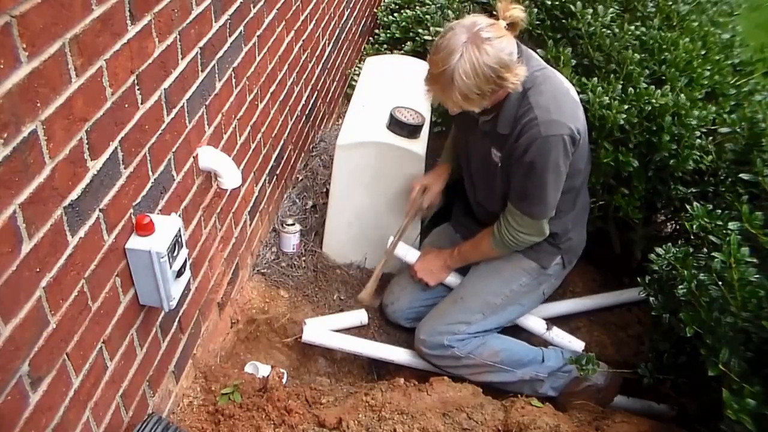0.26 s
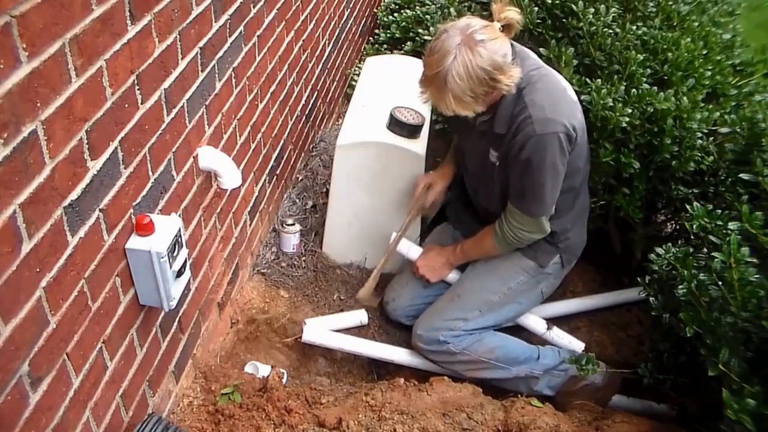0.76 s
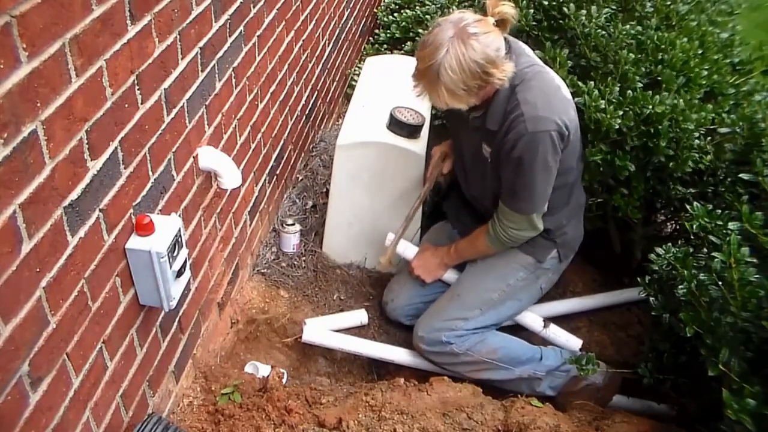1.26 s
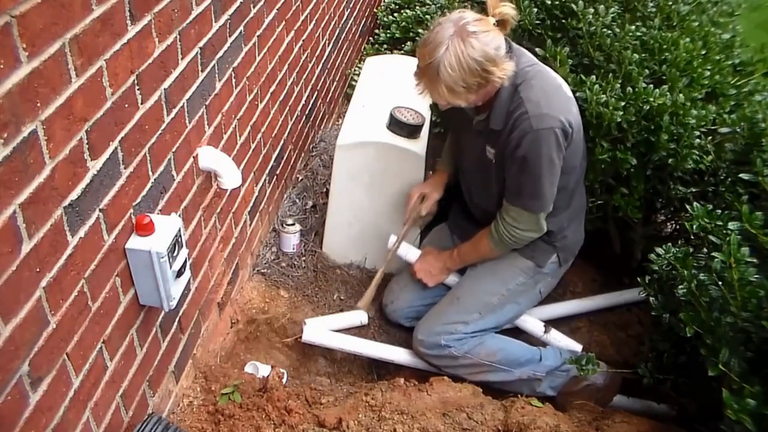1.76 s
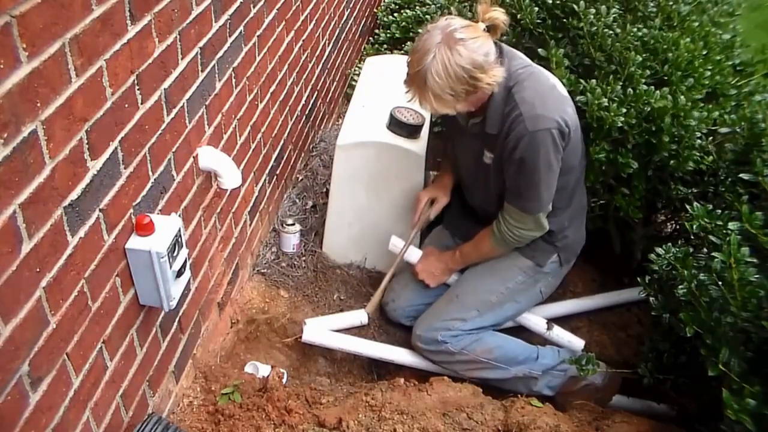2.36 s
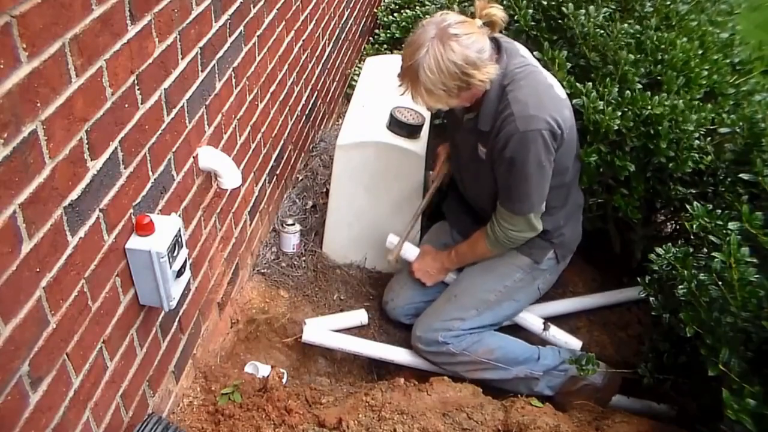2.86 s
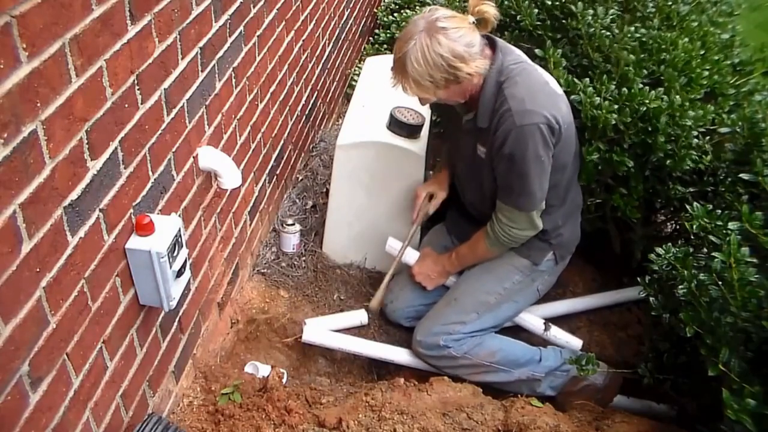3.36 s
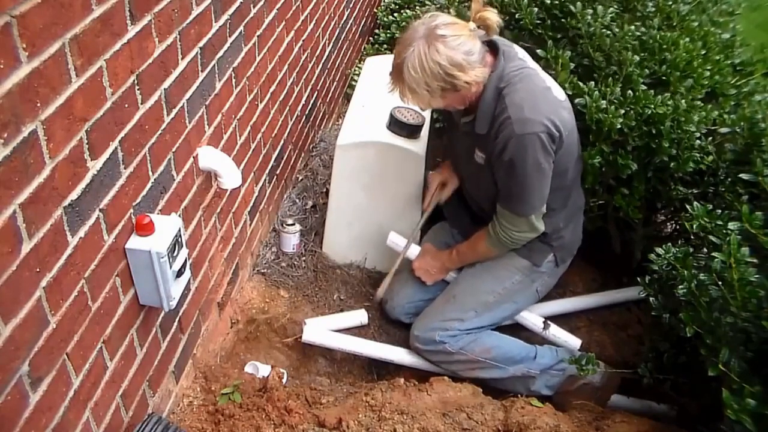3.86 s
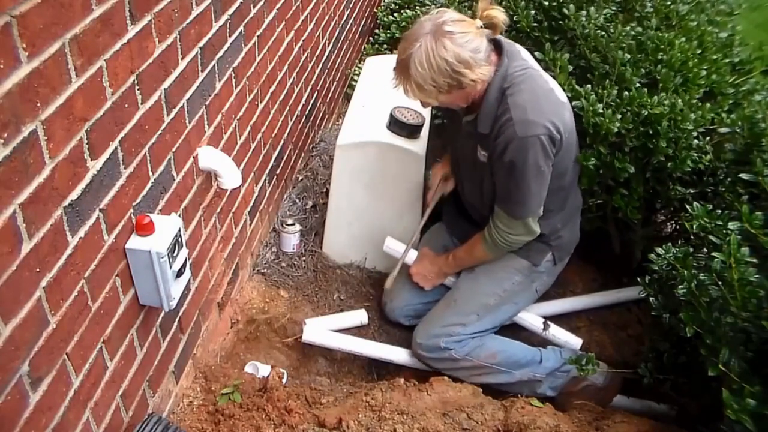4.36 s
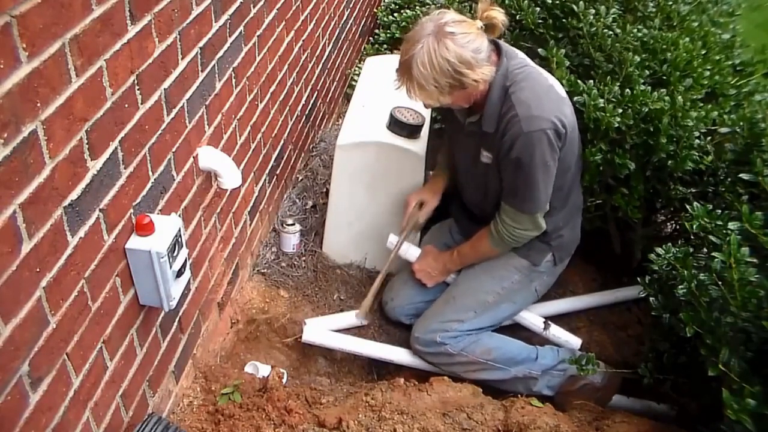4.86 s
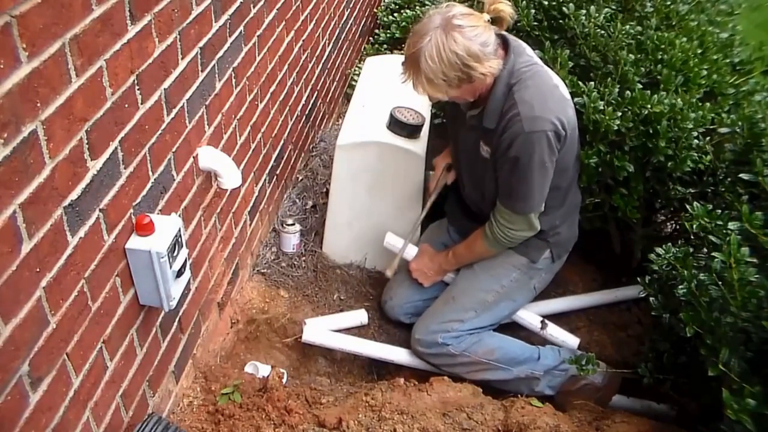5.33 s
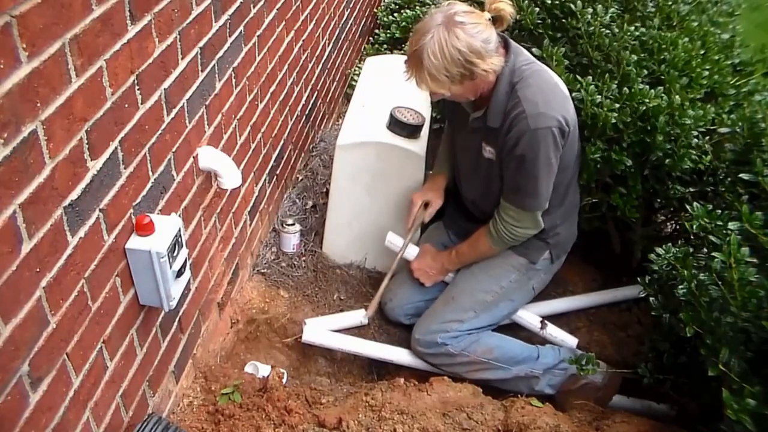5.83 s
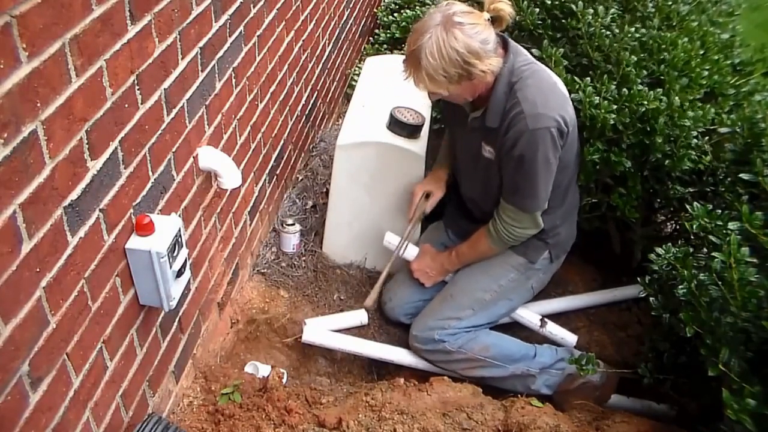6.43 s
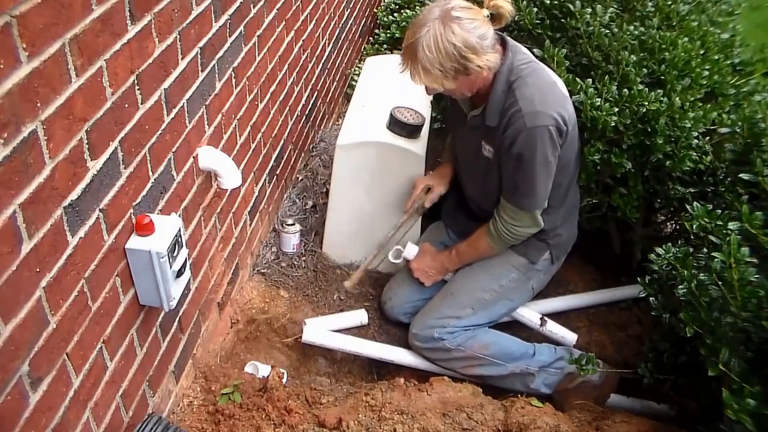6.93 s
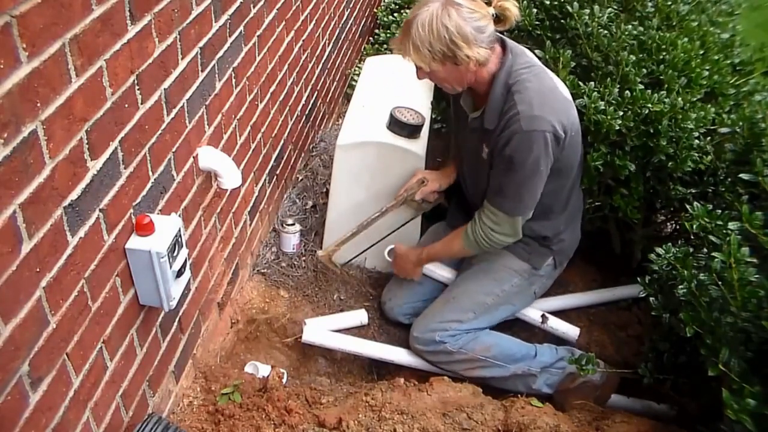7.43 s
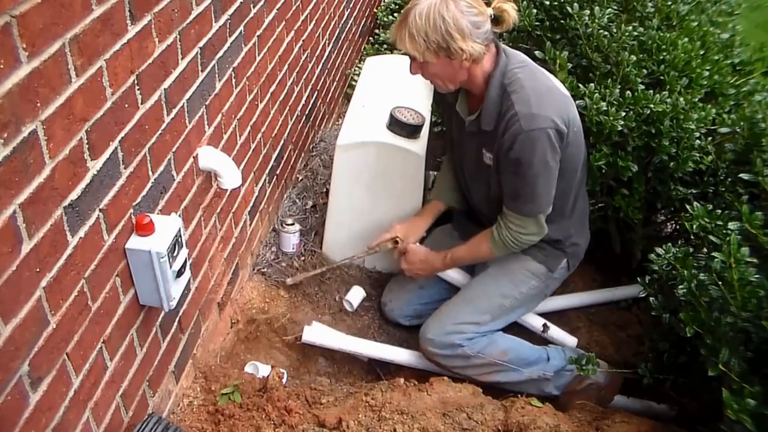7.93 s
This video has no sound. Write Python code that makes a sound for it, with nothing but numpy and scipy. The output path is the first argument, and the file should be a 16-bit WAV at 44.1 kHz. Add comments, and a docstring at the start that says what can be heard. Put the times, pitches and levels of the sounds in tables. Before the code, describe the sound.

A hand saw bites through a thin plastic pipe near a stereo microphone beside a brick wall, which gives a very short reflection. Steady, rapid push strokes buzz and scrape, lighter pulls fill the gaps, and the blade clacks lightly. The cut weakens, ends in a dull thump, and the loose piece cracks against another pipe. Soft garden air, low rumble, hum and thin insects remain underneath.

```python
"""A hand saw rasps through a plastic pipe close to the microphones: a light pull, a hard push, three times a second.
Its teeth tear off chips as noise and, where they bite evenly, sing as tones at their passing rate.
Steel clacks as the blade turns round; a brick wall outdoors answers; rumble, air, hum and insects lie behind.
The deepening cut grows thin and ragged, a faint whistle slides up and down, and the pipe parts with a thump.
The loose end then knocks against other pipes as cracks of noise and damped hollow tones."""
import sys
import numpy as np
from scipy import signal
from scipy.fft import rfft, irfft, next_fast_len
from scipy.io import wavfile
from scipy.ndimage import uniform_filter1d, map_coordinates

SR = 44100
rng = np.random.default_rng(int(sys.argv[2]) if len(sys.argv) > 2 else 0)


def persist_wave(psi):
    """Save psi, clipped to +-1, as 16-bit WAV."""
    counts = np.round(np.clip(psi, -1, 1) * 32767).astype(np.int16)
    wavfile.write(sys.argv[1], SR, np.atleast_2d(counts).T)


N = 361179
T = np.arange(N) / SR  # s

# the steel blade rings on: (frequency [Hz], relative level [dB], time to fall 60 dB [s])
BLADE_MODES = [(1383, -4, 0.028), (3090, -9.5, 0.14), (3416, 5, 0.036), (5150, -30, .1), (5780, -24, 0.062),
               (6170, -7, .1), (7100, -5, 0.13), (10500, -14, .05), (9986, -17, .05)]
# likeness of left and right at the microphones: (frequency [Hz], likeness [0-1])
LIKENESS = [(100, 0.63), (600, 0.58), (1200, 0.98), (2800, 1), (4000, 0.92), (5600, 0.71), (7500, 0.22),
            (10000, 0.53), (13000, 0.12)]


def amp(db):
    """Decibels to gain."""
    return 10 ** (np.asarray(db) / 20)


def unit(x):
    """Scale to rms 1."""
    return x / np.sqrt(np.mean(x ** 2) + 1e-20)


def along(points, hz):
    """Interpolate (frequency [Hz], value) points on a log frequency axis."""
    point_hz, values = np.transpose(points)
    return np.interp(np.log(hz + 1), np.log(point_hz + 1), values)


def wobble(rate):
    """A smooth random curve through rate knots a second."""
    knots = rng.standard_normal(int(N * rate / SR) + 4)
    return map_coordinates(knots, [T * rate])


def swell(t, s, width):
    """A bell-shaped rise and fall about s."""
    return np.exp(-.5 * ((t - s) / width) ** 2)


def envelope(start, attack, hold, release):
    """A straight rise from 0 to 1, a hold and a fall; all times in s."""
    corners = start + np.cumsum([0, attack, hold, release])
    return np.interp(T, corners, [0, 1, 1, 0])


def filtered(x, response):
    """Apply a response of frequency to x."""
    m = next_fast_len(x.shape[-1] + 8192)
    spectrum = rfft(x, m) * response(np.fft.rfftfreq(m, 1 / SR))
    return irfft(spectrum, m)[..., :x.shape[-1]]


def spread(pair, colour, alike=LIKENESS):
    """Two unrelated signals become a coloured left and right of rms 1."""
    def mid_side(hz):
        turn = np.arccos(np.clip(along(alike, hz), -1, 1)) / 2
        return colour(hz) * np.array([np.cos(turn), np.sin(turn)])

    mid, side = filtered(pair, mid_side)
    return unit(np.array([mid + side, mid - side]))


def noise(spectrum, alike=LIKENESS):
    """Stereo noise of rms 1 with the given spectrum."""
    return spread(rng.standard_normal((2, N)), lambda hz: amp(along(spectrum, hz)), alike)


def halves(x, split_hz=6000):
    """The dull and the hissing part of x, each of rms 1."""
    low = filtered(x, lambda hz: 1 / (1 + (hz / split_hz) ** 10))
    return unit(low), unit(x - low)


def patchy(x, depth_db):
    """Narrow bands come and go at random within x."""
    z = signal.stft(x, nperseg=512)[2]
    field = rng.standard_normal(z.shape[1:])
    field = uniform_filter1d(field, size=3, axis=0)  # across frequency
    field = uniform_filter1d(field, size=5, axis=1)  # along time
    return signal.istft(z * amp(depth_db * unit(field)), nperseg=512)[1][:, :N]


def ring(modes, t, scatter_db=2):
    """A blow sets off damped modes, each at a slightly new strength."""
    total = 0
    for hz, db, t60 in modes:
        strength_db = db + scatter_db * rng.normal()
        total = total + amp(strength_db - 60 * t / t60) * np.sin(2 * np.pi * hz * t)
    return total


def stroke(start, end, top_hz, rasp_db, sing_db, bite):
    """One stroke speeds up and slows down: tooth rate and the strengths of rasp, hiss and singing."""
    # treble as the cut deepens: (time [s], hiss relative to rasp [dB])
    treble = [(0, -0.5), (1.9, 2.5), (2.899, 1.5), (4.8, 5), (6.6, 5), (6.91, 3), (7.05, 6), (7.18, -3.5)]
    speed_ease = 1.4  # how gently the arm gathers speed
    firm_db, hiss_per_db = -24, 0.27  # each dB lighter than a firm stroke is relatively this much hissier
    rasp_peak, rasp_width, sing_peak, sing_width, hiss_db = bite
    k = slice(max(int(start * SR), 0), int(end * SR))
    done = np.clip((T[k] - start) / (end - start), 0, 1)
    speed = np.abs(np.sin(np.pi * done)) ** speed_ease
    deepening_db = np.interp((start + end) / 2, *np.transpose(treble))
    hiss = amp(hiss_db + deepening_db + hiss_per_db * (firm_db - rasp_db))
    # rasp and hiss together keep the stroke's rasp level
    scrape = amp(rasp_db) * np.sqrt(speed) * swell(done, rasp_peak, rasp_width) / np.hypot(1, hiss)
    singing = amp(sing_db) * swell(done, sing_peak, sing_width)
    return k, np.array([top_hz * speed, scrape, scrape * hiss, singing])


def arm():
    """The arm pulls the saw back until the next push is due."""
    # each push and the pull that fills the pause before it: (middle of the push [s], its length [s],
    # top tooth rate [Hz], push rasp [dB], push singing [dB], pull rasp [dB], pull singing [dB]); levels relative
    pushes = [(0.165, 0.15, 1163, -25, -18, -42, -41), (.470, 0.15, 1150, -26, -15.5, -37.5, -43),
              (.772, 0.15, 1250, -25, -14, -35, -47), (1.072, .15, 1227, -26, -16.5, -37, -43),
              (1.381, 0.16, 1400, -24.5, -20.5, -35, -47), (1.694, 0.16, 1474, -25, -26.5, -35, -47),
              (2.008, 0.17, 1250, -27, -21.5, -37.5, -49), (2.319, 0.16, 1247, -23.5, -26, -35.5, -44),
              (2.623, 0.15, 1256, -27.5, -18.5, -37.5, -43.5), (2.943, .17, 1183, -27.5, -18, -40, -38),
              (3.241, .165, 1218, -24.5, -51, -35, -31.5), (3.551, 0.16, 1235, -34.5, -38, -41.5, -59),
              (3.866, 0.17, 1450, -27.5, -26, -41.5, -45), (4.169, 0.17, 1238, -27.5, -28.5, -37.5, -51),
              (4.482, 0.18, 1228, -29, -29, -40, -38.5), (4.786, 0.17, 1313, -31, -40.5, -39, -45),
              (5.111, .155, 1237, -32.5, -31, -48, -49), (5.421, .17, 1165, -30, -37.5, -41.5, -42),
              (5.735, 0.17, 1190, -33, -35, -42, -45), (6.042, 0.18, 1137, -38, -41, -52, -65),
              (6.335, 0.16, 1013, -31.5, -38, -45.6, -53), (6.62, 0.19, 1120, -36.5, -49, -39.5, -57),
              (6.919, .17, 1099, -48, -70, -52.5, -57), (7.177, .145, 1094, -35, -35, -32, -39)]
    first_pull_s, pull_hz = -.07, 1185  # the first pull starts; top tooth rate of every pull
    # rasp peak, rasp width, singing peak, singing width (shares of the stroke), hiss offset (dB)
    push_bite = (0.5, 0.29, 0.4725, 0.097, 0.57)
    pull_bite = (0.66, 0.85, 0.517, 0.103, -1.9)
    controls, turn = np.zeros((4, N)), first_pull_s
    for middle, length, top_hz, push_db, push_sing_db, pull_db, pull_sing_db in pushes:
        start, end = middle - length / 2, middle + length / 2
        pull = stroke(turn, start, pull_hz, pull_db, pull_sing_db, pull_bite)
        push = stroke(start, end, top_hz, push_db, push_sing_db, push_bite)
        for k, values in (pull, push):
            controls[:, k] = values
        turn = end
    return controls


def saw(rasp_db=4.0, hiss_db=-2.0, tone_db=0.5, chip_db=2.0, judder_db=1.5, toothed=0.2,
        flutter_db=3.0, buzz_db=-9, radiate_hz=780):
    """Every tooth tears off chips; evenly biting teeth shake the pipe at their passing rate."""
    # rasp before the resonances: (frequency [Hz], relative level [dB per Hz])
    rasp_spectrum = [(60, -18), (170, -10), (350, -10.5), (650, -9), (1000, -7), (1600, -3.5), (3000, 3),
                     (4600, -1.5), (6000, -4), (8300, -4), (10500, -4), (13000, -8), (14200, -11.5),
                     (14600, -53), (15600, -48)]
    # resonances of pipe and blade under the teeth: (frequency [Hz], width [Hz], level [dB])
    resonances = [(1087, 110, 9.5), (1515, 117, 9.5), (1837, 73, 9.5), (2037, 46, 4), (2670, 110, 1.5),
                  (3350, 93, 3.5), (5450, 590, 5.5), (6280, 130, 6), (7360, 180, 5.5), (9400, 510, -4)]
    # overtones of the tooth note; teeth set alternately left and right add half orders:
    # (order, level re singing [dB], level re rasp [dB])
    overtones = [(1.5, -19.5, -9.5), (2, -15.5, -6.5), (2.5, -24, -11), (3, -25, -10), (4, -37, -13),
                 (5, -40, -19)]
    # uneven biting: always, extra as the wall gives way, and how soon before the pipe parts
    ragged_rad, breaking_rad, breaking_s, cut_through_s = 0.23, 1.2, 0.79, 7.3
    shudder_db, shudder_fade_db_per_s = -46, 8  # the held pipe rocks less as the blade settles in

    tooth_hz, scrape, hiss, sing = arm()
    ragged = ragged_rad + breaking_rad * np.exp(np.minimum(T - cut_through_s, 0) / breaking_s)
    phase = 2 * np.pi * np.cumsum(tooth_hz) / SR + ragged * wobble(350)

    def rasp_colour(hz):
        body_power = sum(amp(db) ** 2 / (1 + (2 * (hz - c) / w) ** 2) for c, w, db in resonances)
        return amp(along(rasp_spectrum, hz)) * np.sqrt(1 + body_power)

    tearing = (1 + toothed * np.cos(phase)) * amp(chip_db * wobble(2500) + judder_db * wobble(150))
    grit = patchy(tearing * rng.standard_normal((2, N)), depth_db=3.5)
    dull, bright = halves(spread(grit, rasp_colour))
    chips = amp(rasp_db) * scrape * dull + amp(hiss_db) * hiss * bright

    # even a rough stroke carries broken scraps of the tooth note and its overtones
    scraps = amp(buzz_db) * scrape * unit(amp(8.2 * wobble(110)))
    note = np.hypot(amp(tone_db) * sing, scraps) * np.sin(phase)
    for order, sing_db, scrape_db in overtones:
        strength = np.hypot(amp(sing_db) * sing, amp(scrape_db) * scrape)
        strength = strength * unit(amp(6.6 * wobble(45)))
        note = note + strength * np.sin(round(2 * order) / 2 * phase + .3 * wobble(120))
    note = np.sqrt(2) * note * amp(flutter_db * wobble(220))
    # a thin pipe radiates slow tooth rates poorly
    note = filtered(note, lambda hz: hz ** 2 / np.hypot(hz ** 2, radiate_hz ** 2))

    # the sideways set of the teeth repeats every six teeth and rocks the pipe
    rocking = np.sin(phase / 6 + 1.0 * wobble(70))
    shudder = amp(shudder_db - shudder_fade_db_per_s * T) * tooth_hz / tooth_hz.max() * rocking
    return chips + note + shudder


def wall(x, t60=0.16, wet_db=-15):
    """Bricks and ground scatter a short answer, a fading stereo noise tail."""
    t = T[:SR // 4]
    tail = spread(rng.standard_normal((2, len(t))), lambda hz: 1 / np.hypot(1, hz / 9000))
    tail = tail * amp(-60 * t / t60) * (t > .004)  # silent until the first return
    return amp(wet_db) * signal.fftconvolve(x, tail / np.linalg.norm(tail[0]), axes=1)[:, :N]


def insects(level_db, pitch_hz=5400):
    """A thin, rough trill that flutters in pitch and strength."""
    flutter = 2 * np.pi * np.cumsum(27 + 6 * wobble(9)) / SR  # about 27 a second
    hz = pitch_hz + 100 * np.sin(flutter) + 70 * wobble(12) + 170 * wobble(900)
    left_right_rad = .6 * np.array([wobble(500), wobble(500)])
    trill = np.sin(2 * np.pi * np.cumsum(hz) / SR + left_right_rad)
    return amp(level_db) * unit(trill * amp(1.5 * wobble(27) + 2.8 * np.cos(flutter)))


def garden(hum_hz=99, hum_db=-64, hum_swell_db=10):
    """Far rumble and soft air as shaped noise, a wavering hum, and the insects' trill."""
    # the far rumble: (frequency [Hz], relative level [dB per Hz])
    rumble_spectrum = [(15, -10), (23, 2.5), (30, 6.5), (42, -2), (70, -1.5), (100, -2.5), (140, -8.5),
                       (220, -16), (400, -15.5), (700, -30.5)]
    # the soft air: (frequency [Hz], relative level [dB per Hz])
    air_spectrum = [(150, -27), (300, -3.5), (450, 1), (1100, 2), (2200, -4.5), (3600, -4.5), (5000, -12),
                    (10000, -16), (14000, -30), (14600, -42), (15500, -60)]
    # rumble, air and insects dip briefly: (time [s], level change [dB])
    lulls = [(2.8, -5.5), (4.97, -5), (5.9, -7.5)]
    lull_width_s = 0.066
    # the place sounds louder at first, and swells again as the sawing stops
    opening_share, opening_s = .7, 0.72  # share of the swell at the start; its decay time
    rise = envelope(start=7.184, attack=0.11, hold=0.7, release=0.15)
    raised = rise + opening_share * np.exp(-T / opening_s)
    lull_db = sum(db * swell(T, s, lull_width_s) for s, db in lulls)

    def level(steady_db, swell_db):
        return steady_db + swell_db * raised + lull_db

    rumble = amp(level(-51, 5) + 0.93 * wobble(4.2))
    rumble = rumble * noise(rumble_spectrum, [(30, 0.49), (80, 0.39)])  # likeness by Hz
    air = amp(level(-55.5, 4.5) + wobble(7.5)) * patchy(noise(air_spectrum), depth_db=4.0)
    hum_strength = amp(hum_db + hum_swell_db * rise + 0.79 * wobble(2.45))
    hum = hum_strength * np.sin(2 * np.pi * hum_hz * T + wobble(13))
    return rumble + air + insects(level(-59, 7.5)) + hum


def clacks(hiss_db=3, burst_db=7, burst_t60=.024, tail_db=-20, tail_t60=0.27, ring_db=-14,
           attack=0.0001, drag_db=-17, drag_width=0.0076):
    """The blade drags, then snaps across the cut: a short chatter and faint steel ringing."""
    # the blade clacks: (time [s], relative level [dB])
    blade_clacks = [(0.2673, -20.5), (0.587, -22), (0.8801, -21.5), (1.167, -22.5), (1.4591, -19.5),
                    (1.7614, -20.5), (2.0716, -19.5), (2.3924, -20), (2.6962, -20.5), (3.003, -24.5),
                    (3.3157, -18), (3.623, -21.5), (3.927, -20), (4.2374, -21.5), (4.551, -20),
                    (4.8629, -20), (5.1961, -21), (5.5156, -20), (5.8154, -21), (6.1065, -19.5),
                    (6.4504, -19.5), (6.7279, -21), (7.528, -28), (7.8863, -24.5)]
    # the chatter: (frequency [Hz], relative level [dB per Hz])
    chatter_spectrum = [(100, -30), (700, -23.5), (1300, -12.5), (1800, -20.5), (2600, -10), (3700, 0),
                        (4600, -10), (5500, 1), (6300, -3), (7500, -5), (8500, -13), (10300, -6),
                        (12500, -14.5), (14000, -15), (16000, -49)]
    dull, bright = halves(noise(chatter_spectrum))
    out = np.zeros((2, N))
    for s, db in blade_clacks:
        first = round(s * SR)
        k = slice(first, first + SR // 4)
        t = T[k] - T[k][0]
        chatter = (dull[:, k] + amp(hiss_db) * bright[:, k]) / np.hypot(1, amp(hiss_db))
        fade = np.hypot(amp(burst_db - 60 * t / burst_t60), amp(tail_db - 60 * t / tail_t60))
        # a shared ring, plus one of opposite sign at left and right
        steel = ring(BLADE_MODES, t) + .5 * np.array([ring(BLADE_MODES, t), -ring(BLADE_MODES, t)])
        out[:, k] += amp(db) * (chatter * fade + amp(ring_db) * steel) * (1 - np.exp(-t / attack))
        lead = slice(first - SR // 40, first)
        out[:, lead] += amp(db + drag_db) * dull[:, lead] * swell(T[lead], s, drag_width)
    return out


def ticks(t60=0.042, attack=0.0007, ring_db=-12):
    """Single teeth catch on the rim of the cut, or tap it while the saw is lifted away."""
    # light ticks and catches of the teeth: (time [s], relative level [dB])
    catches = [(2.2005, -18.5), (2.967, -19), (3.216, -20), (3.526, -29), (4.152, -27), (5.683, -32),
               (6.343, -24), (7.0443, -20.5), (7.204, -44), (7.389, -41), (7.434, -36), (7.459, -33.5),
               (7.578, -34), (7.607, -41), (7.632, -44)]
    chatter = noise([(400, -12), (900, -3.5), (1600, -7.0), (2600, -2), (3300, 10.5),
                     (4400, -4), (6000, -0.5), (14000, -32), (15000, -50)])  # (Hz, dB per Hz)
    chatter = patchy(chatter, depth_db=1.5)
    out = np.zeros((2, N))
    for s, db in catches:
        first = round(s * SR)
        k = slice(first, first + SR // 8)
        t = T[k] - T[k][0]
        tick = amp(-60 * t / t60) * chatter[:, k] + amp(ring_db) * ring(BLADE_MODES, t)
        out[:, k] += amp(db) * (1 - np.exp(-t / attack)) * tick
    return out


def whistles(fifth_db=-24):
    """A faint tone with a weak fifth above climbs to its top and slides down, wavering."""
    # each rise and fall: (time of the top [s], top pitch [Hz], relative level [dB])
    slides = [(6.59, 1540, -49.5), (7.635, 1535, -42.5)]
    rise_hz_per_s, fall_hz_per_s = 2600, 2200
    lag_s, width_s = .035, 0.072  # loudest just after the top
    out = np.zeros(N)
    for s, top_hz, db in slides:
        sag_hz = np.maximum(rise_hz_per_s * (s - T), fall_hz_per_s * (T - s))
        waver, flutter_db = .7 * wobble(170), 2.4 * wobble(90)
        phase = 2 * np.pi * np.cumsum(np.maximum(top_hz - sag_hz, 0)) / SR + waver
        fifth = np.sin(3 * phase / 2 + wobble(250))
        strength = amp(db + flutter_db) * swell(T, s + lag_s, width_s)
        out += strength * (np.sin(phase) + amp(fifth_db) * fifth)
    return np.sqrt(2) * out


def offcut(crack_t60=0.021, rustle_db=1, ring_attack=0.00062):
    """A thump sinking in pitch and a low rustle as the pipe parts, then hollow plastic knocks."""
    # the loose piece hits a pipe and bounces: (time [s], crack level [dB], ring level [dB]); levels relative
    knocks = [(7.9738, -12.5, -23), (7.9808, -23, -6.8), (7.9885, -28, -40)]
    # the short piece of pipe: (frequency [Hz], relative level [dB], time to fall 60 dB [s])
    piece_modes = [(1593, -22, .11), (1690, 0, .025), (2751, -25, .05), (4576, -30, .05)]
    # the crack of a knock: (frequency [Hz], relative level [dB per Hz])
    crack_spectrum = [(200, -33), (900, -14), (2000, 10), (2600, 7.5), (3300, -8), (4100, 5), (4800, -9),
                      (5700, 0), (9000, -7), (14000, -26), (16000, -32)]
    thump_s, thump_db = 7.197, -42.5
    start_hz, end_hz, sink_hz_per_s = 235, 80, 2900
    hz = np.clip(start_hz - sink_hz_per_s * (T - thump_s), end_hz, start_hz)
    strength = amp(thump_db) * envelope(thump_s, attack=.01, hold=0.038, release=.025)
    thump = strength * np.sqrt(2) * np.sin(2 * np.pi * np.cumsum(hz) / SR + 0.27 * wobble(90))
    rustle = noise([(40, -15), (90, 7), (220, 3), (500, -14), (1500, -40)])  # (Hz, dB per Hz)
    out = thump + strength * amp(rustle_db) * rustle
    crack = noise(crack_spectrum)
    for s, crack_db, ring_db in knocks:
        first = round(s * SR)
        k = slice(first, first + SR // 6)
        t = T[k] - T[k][0]
        hollow = ring(piece_modes, t, scatter_db=.3) * (1 - np.exp(-t / ring_attack))
        out[:, k] += amp(crack_db - 60 * t / crack_t60) * crack[:, k] + amp(ring_db) * hollow
    return out


def scene():
    """The work close by, the loose piece down on the soft soil, the garden behind."""
    work = saw() + clacks() + ticks()
    piece = offcut()
    piece_to_wall_db = -15  # little of the piece's sound reaches the wall
    answer = wall(work + amp(piece_to_wall_db) * piece)
    return work + answer + garden() + whistles() + piece


def record(dry):
    """The two microphones differ slightly in colour; nothing above the band limit is kept."""
    # left minus right at the microphones: (frequency [Hz], level difference [dB])
    tilt = [(25, -6), (80, 0), (700, -0.9), (1300, 0.5), (3000, -0.6), (5500, -0.7), (10000, -0.5),
            (13000, 0.5)]
    top_hz = 14600

    def microphones(hz):
        return amp(np.outer([.5, -.5], along(tilt, hz))) * (hz < top_hz)

    return filtered(dry, microphones)


dry = scene()
out = record(dry)
persist_wave(out)
```